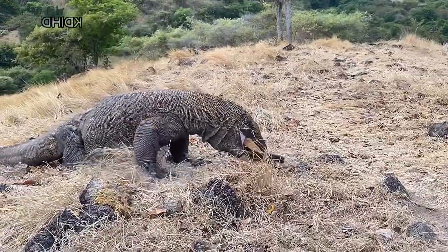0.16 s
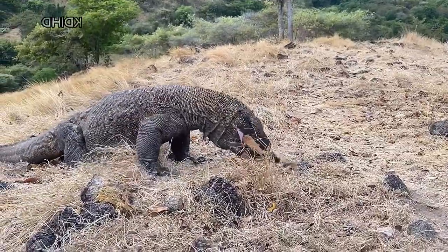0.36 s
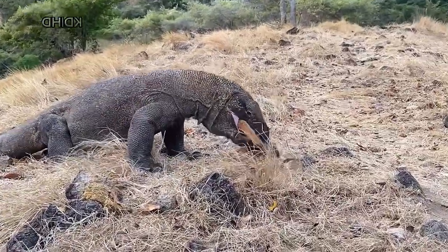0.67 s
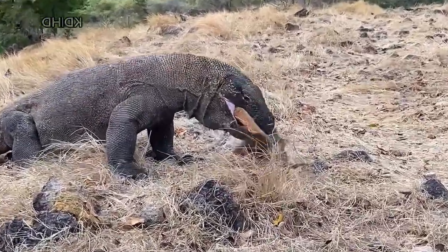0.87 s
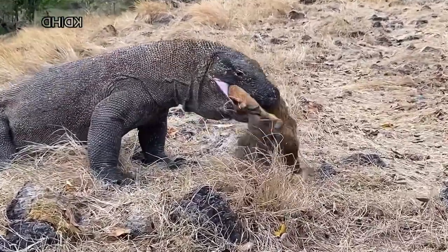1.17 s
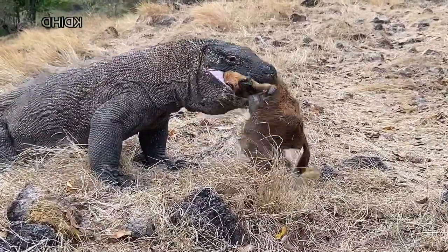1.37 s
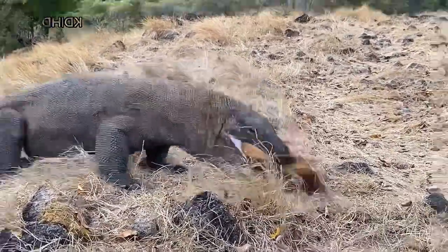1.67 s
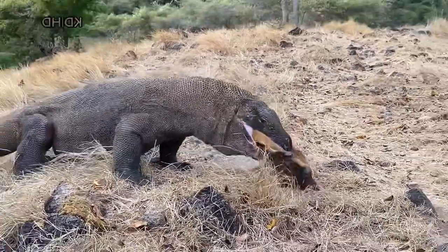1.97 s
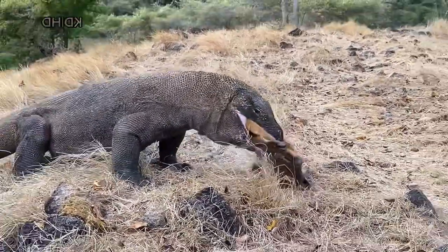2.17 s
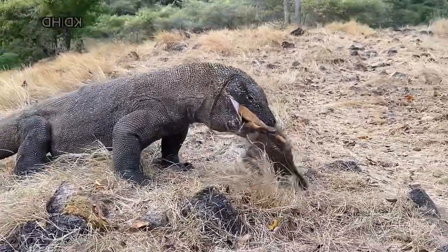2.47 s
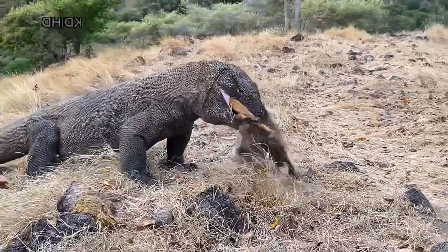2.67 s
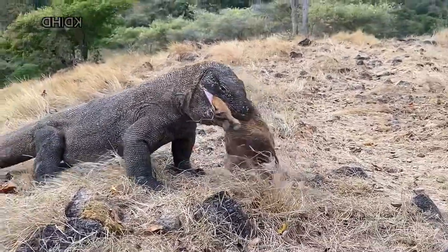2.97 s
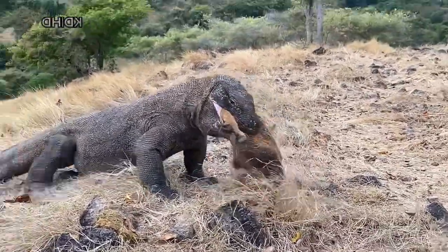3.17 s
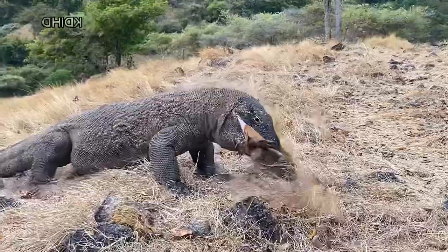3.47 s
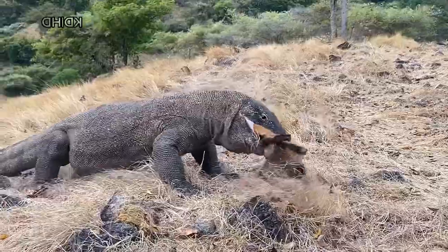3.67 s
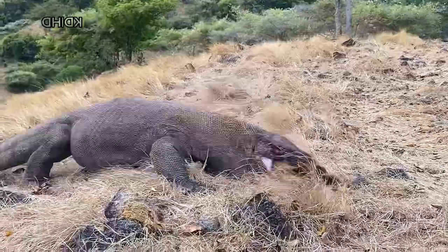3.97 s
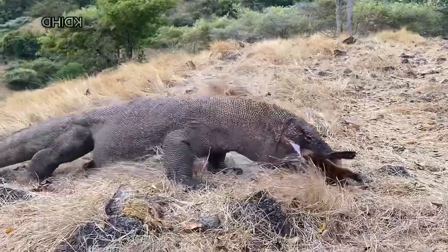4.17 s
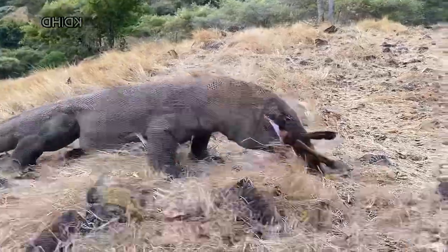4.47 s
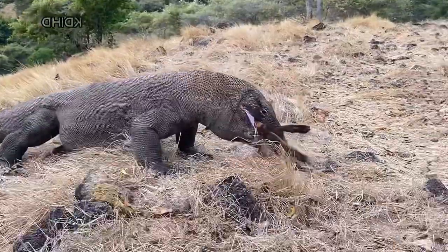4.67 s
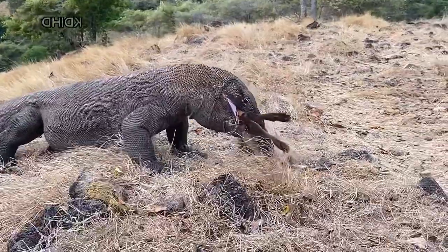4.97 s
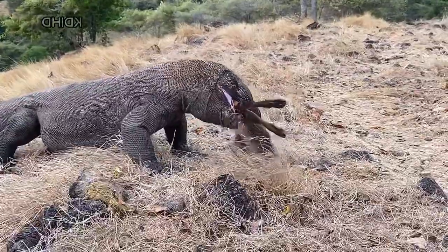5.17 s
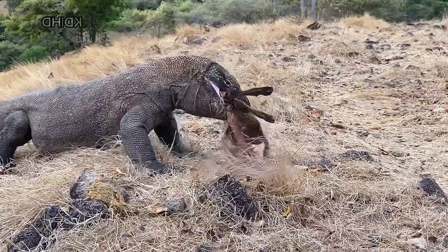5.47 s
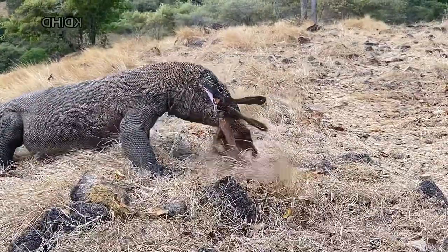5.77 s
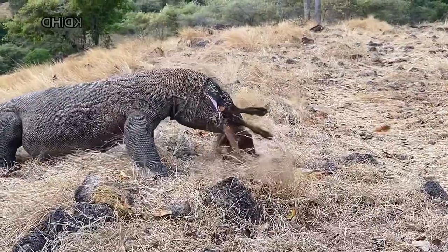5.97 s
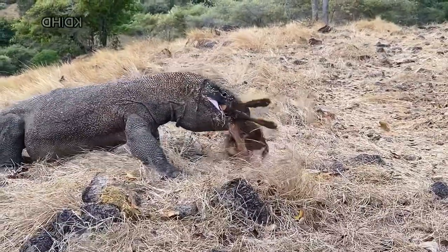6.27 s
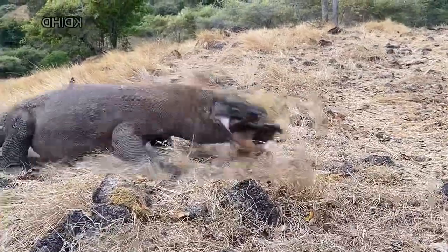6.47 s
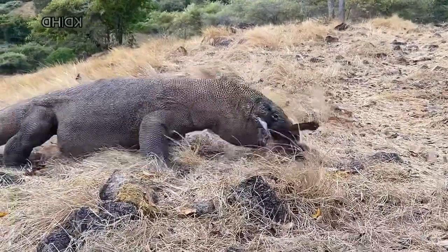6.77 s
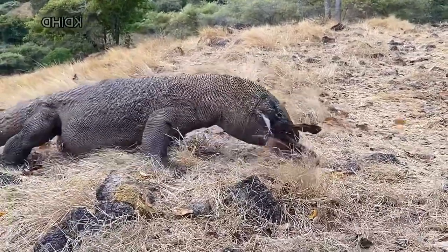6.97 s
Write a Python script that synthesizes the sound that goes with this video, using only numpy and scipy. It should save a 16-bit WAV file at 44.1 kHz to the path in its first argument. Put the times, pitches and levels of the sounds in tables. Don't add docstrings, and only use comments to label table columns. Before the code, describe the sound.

Gusty wind buffets an outdoor microphone with lumpy rumble, roar and popping slaps, while dry grass hisses and crackles faintly behind.

```python
import sys
import numpy as np
from scipy import signal
from scipy.io import wavfile
from scipy.ndimage import uniform_filter1d

SR = 44100
rng = np.random.default_rng(int(sys.argv[2]) if len(sys.argv) > 2 else 0)


def volts_from_decibels(level):
    exponent = np.asarray(level, float) / 20
    return 10 ** exponent


def put_to_file(sound):
    columns = np.atleast_2d(sound).T
    safe = np.clip(columns, -1, 1)
    whole_steps = np.round(safe * 32767)
    wavfile.write(sys.argv[1], SR, whole_steps.astype(np.int16))


N = 313992

# start_s, level_db
GRASS_LEVEL = [(0, -51), (.06, -57), (1.39, -54), (2.3, -52.5), (2.64, -49.5), (3.25, -47.5), (4.34, -48.5),
               (6.6, -48), (7.12, -52)]
# freq_hz, level_db (per Hz)
HISS_COLOUR = [(100, 5), (300, -16), (700, -1), (1000, -5), (1400, -9), (2000, -3.3), (2600, -2.5),
               (3500, -3.4), (5000, -1.4), (6800, -2.5), (8100, -2.5),
               (9000, 4.5), (11200, -0.4), (13300, 0.7), (15000, -3), (16000, -6.5)]
# middle_s, half_length_s, rise_db
LUNGES = [
    (1.66, 0.097, 3.5),
    (4.0, .08, 2.5),
    (1.704, 0.044, 7.),
]
# start_s, peak_db
STALKS = [(0.155, -49), (0.2676, -46), (0.7696, -49), (1.3993, -47), (1.5449, -35.5), (2.0216, -40),
          (2.451, -37), (2.6393, -40), (2.7267, -36), (5.4095, -40), (5.467, -43), (6.355, -44),
          (6.6024, -37), (6.6338, -37), (6.7845, -38)]

# start_s, strength_db, keenness_db (upper roar over the lower)
BREEZE_DRIFT = [(0, -85, -38), (.1, -56, -46), (.4, -45, -52), (.46, -19, -27.5), (1.0, -27, -16.5),
                (1.3, -21.5, -13.5), (1.9, -23, -8.5), (2.3, -20, -6.5), (2.778, -18, -5), (3.05, -46, -37),
                (3.6, -33.5, -30.5), (3.78, -72.5, -30), (3.97, -62, -11), (4.12, -28, -26.5),
                (5.15, -25.5, -23), (5.45, -18, -7), (6.2, -17.5, -6.5), (7.12, -19, -5.5)]
# middle_s, half_length_s, rise_db
GUSTS = [(0.15, 0.018, 14.5), (0.308, 0.029, 17), (0.436, 0.006, 13), (0.675, 0.012, 2.5),
         (0.773, 0.0087, 2), (1.051, 0.044, 8.5), (1.222, 0.0075, 1), (1.607, 0.011, 8.5),
         (1.774, 0.0067, 4), (1.966, 0.055, 10.5), (2.037, 0.017, 6.5), (2.418, 0.029, 6.5),
         (2.934, 0.045, 15), (3.253, 0.014, 9.5), (3.447, 0.032, 21), (3.535, 0.0068, 19.5),
         (3.722, 0.015, 12.5), (4.097, 0.035, 11.9), (4.495, 0.068, 6.5), (4.578, 0.013, 7.5),
         (4.696, 0.014, 9), (5.037, 0.037, 7.5), (5.312, 0.016, 5.5), (6.72, 0.009, 5.5)]
# middle_s, half_length_s, drop_db
LULLS = [(0.238, 0.03, 3), (0.389, 0.011, 9.7), (0.489, 0.033, 12.5), (0.72, 0.024, 16), (1.14, 0.024, 23),
         (1.198, 0.025, 10.5), (1.248, 0.011, 27), (1.29, 0.025, 20.5), (1.317, 0.015, 9),
         (1.375, 0.012, 14), (1.558, 0.046, 6.5), (1.839, 0.0084, 17), (2.312, 0.022, 11),
         (2.59, 0.02, 6.2), (3.104, 0.025, 14), (3.165, 0.019, 15), (3.342, 0.049, 11), (3.654, 0.027, 19),
         (4.152, 0.02, 19), (4.613, 0.0092, 9), (4.944, 0.0088, 17), (5.146, 0.013, 19), (5.79, 0.048, 4.5),
         (5.934, 0.027, 8.5), (6.031, 0.022, 25), (6.235, 0.0083, 9), (6.29, 0.083, 5), (6.512, 0.04, 8.5)]
# middle_s, half_length_s, drop_db
BREAKS = [(1.907, .012, 3.5), (2.093, 0.0084, 10), (2.49, 0.0097, 3), (2.673, 0.0088, 8.),
          (2.865, .015, 6.), (3.57, .012, 6), (3.86, 0.067, 13), (5.488, 0.0086, 10), (5.599, .008, 5),
          (6.166, 0.016, 5), (6.702, 0.012, 14.5), (6.964, 0.016, 10)]
# middle_s, half_length_s, rise_db
RASPS = [(.66, 0.041, 8), (1.42, .02, 0.5), (2.166, 0.015, 4), (2.4, .03, 2), (2.535, 0.042, 5.5),
         (2.64, 0.044, 2.), (2.713, 0.038, 5.5), (4.112, 0.02, 10), (4.531, .03, 3), (4.804, .04, 4.5),
         (5.2, .02, 7), (5.411, 0.032, 6), (5.63, .035, 4), (5.862, 0.028, 6), (6.095, 0.039, 4.),
         (6.355, 0.014, 5.), (6.613, 0.048, 2.5), (6.76, 0.055, 4.), (6.895, 0.036, 5), (7.08, 0.018, 3.)]
# middle_s, half_length_s, rise_db
HEAVES = [(.7, 0.04, 3.5), (1.445, .03, 5), (1.972, 0.036, 4), (2.182, 0.13, 4.5), (2.767, 0.035, 0),
          (3.057, 0.1, 5.5), (3.467, 0.029, 3.), (3.74, .05, 7.5), (4.112, 0.026, 5), (5.683, .05, 2.5),
          (6.0, .045, 4.), (6.787, 0.066, 4)]

# start_s, peak_db, brightness_db, pitch_hz (of the pop)
SLAPS = [(.433, -12.5, -61, 455), (.766, -8.5, -27, 514), (1.213, -11, -36, 536), (1.338, -9, -30, 644),
         (1.467, -6.5, -33, 523), (1.591, -9.5, -36, 680), (1.757, -2.5, -23, 570),
         (1.79, -4.5, -13.5, 452), (1.927, -3.5, -12, 720), (1.954, -2.5, -16, 443), (2.156, -5, -5.5, 460),
         (2.388, 1, -10.5, 544), (2.512, -7, -6, 450), (2.576, -4, -3, 1180), (2.72, 4.5, -6, 680),
         (2.788, -0.5, -26, 515), (4.085, -14.5, -35, 510), (4.512, -11.5, -15, 496),
         (4.684, -11, -42, 475), (4.727, -13, -21, 720), (5.6, -3.5, -8.5, 646), (5.646, -4, -12.5, 675),
         (5.731, -1.5, -12.5, 650), (5.85, -2, -6.5, 445), (6.063, 3, -4.5, 475), (6.191, 3, -20, 640),
         (6.356, -2, -6.5, 616), (6.714, -4, -9, 740), (6.882, 0, -5.5, 675), (6.93, -0.5, -8, 557)]
# start_s, peak_db
PUFFS = [(.523, -16.5), (.642, -14), (.678, -9), (.903, -13.5), (1.06, -9), (1.419, -9.5), (1.707, -5.5),
         (1.853, -10), (2.105, -6.5), (2.247, -11), (2.449, -9), (2.624, -8), (2.679, -3), (2.9, -14),
         (3.534, -26), (4.456, -14.5), (4.556, -9), (4.791, -19), (4.923, -14.5), (5.007, -19.5),
         (5.096, -13), (5.174, -16.5), (5.303, -8), (5.498, -14), (5.948, -12.5), (6.419, -5.5),
         (6.6, -3.5), (6.749, -7), (6.785, 1.5), (7.061, -10)]
# middle_s, peak_db, pitch_hz
PIPS = [(1.218, -13, 800), (1.268, -30, 650), (1.335, -13, 750), (2.797, -12, 750), (3.213, -40, 750),
        (3.6, -36, 600), (4.1, -21, 800), (4.51, -27, 1050), (4.527, -24.5, 1240), (4.57, -33, 1400),
        (4.75, -26, 895), (4.826, -28, 845), (4.966, -28, 900)]

# freq_hz, level_db
PORT_COLOUR = [(30, -39), (46, 2.5), (72, 1), (150, 0), (400, -0.28), (800, 0.5), (1500, -3.5), (3000, -5),
               (6000, -26.5)]
# freq_hz, likeness (0 to 1)
PORT_LIKENESS = [(40, .985), (100, .96), (180, .83), (310, .91), (600, .88), (1200, .75), (1700, .92),
                 (2100, 1)]
# freq_hz, difference_db
PORT_LEAN = [(320, 0), (490, 2), (750, 5.5), (1150, 6.5), (1750, 3.5), (2400, 0)]
# freq_hz, phase_rad
PORT_LEAD = [(60, 0), (430, .4), (1120, .15), (1460, .6), (2100, 0)]


def evened(x):
    return x / np.sqrt(np.mean(x ** 2) + 1e-20)


def read(points, hz):
    f, value = np.transpose(points)
    return np.interp(np.log(hz + 1), np.log(f + 1), value)


def lumps(t, per_s):
    knots = rng.standard_normal(4000)
    return np.interp(t * per_s, np.arange(len(knots)), knots) * np.sqrt(1.5)


def swells(t, rows):
    return sum(db * np.exp(-((t - middle) / half) ** 2) for middle, half, db in rows)


def noise_grid(size):
    frames = 4 * N // size + 5
    a, b, c, d = rng.standard_normal((frames, size // 2 + 1, 4)).T
    hz = np.fft.rfftfreq(size, 1 / SR)[:, None]
    t = np.arange(frames) * size / 4 / SR
    return hz, t, a + 1j * b, c + 1j * d


def sounded(z, band_hz):
    size = 2 * (z.shape[-2] - 1)
    samples = signal.istft(z, nperseg=size, noverlap=3 * size // 4)[1][..., :N]
    return samples * np.sqrt(1.5 * SR / size / band_hz)


def spread(hz, t, a, b):
    slip = np.pi / 2 * (hz - 6850) / 2150 * (hz > 7500)
    edge = .38 + .07 * lumps(t, 43.)
    mid = a * np.cos(slip) * (abs(np.cos(slip)) > edge)
    side = 1j * (.7 * a + .5 * b) * np.sin(slip) * (abs(np.sin(slip)) > edge + .1)
    wide_hz, wide_until_s = 2000, .8
    side = side + 0.9 * b * (hz < wide_hz)
    side = side + 0.39 * b * (hz >= wide_hz) * (hz < 6400) * (t < wide_until_s)
    return np.array([mid + side, mid - side])


def grass():
    hz, t, a, b = noise_grid(size=512)
    start_s, hiss_db = np.transpose(GRASS_LEVEL)
    chance = rng.standard_normal(a.T.shape).T
    patches = evened(uniform_filter1d(uniform_filter1d(chance, 6, 0), 20, 1))
    top_db = (-9.5 + 2.5) * np.clip((hz - 8000) / 1500, 0, 1)
    level_db = np.interp(t, start_s, hiss_db) + swells(t, LUNGES) + top_db + 0.25 * lumps(t, 42.)
    power = volts_from_decibels(read(HISS_COLOUR, hz) + level_db + 1.2 * patches) ** 2
    for start, peak_db in STALKS:
        snap_db = peak_db - 9.0 - 6. * ((hz - 4500) / 3000) ** 2
        power += volts_from_decibels(snap_db) ** 2 * np.exp(-((t - start - .0018) / 0.0063) ** 2)
    return sounded(spread(hz, t, a, b) * np.sqrt(power) * (hz < 15830), 4830)


def breeze(t):
    start_s, drift_db, keen_db = np.transpose(BREEZE_DRIFT)
    quick_db = swells(t, GUSTS) - swells(t, LULLS) - swells(t, BREAKS)
    rasp_db = swells(t, RASPS)
    keen_db = np.interp(t, start_s, keen_db) + 0.23 * quick_db + rasp_db
    return np.interp(t, start_s, drift_db), quick_db + 0.27 * rasp_db, keen_db


def eddies():
    puff_dull_db, puff_hz = -6, 531
    return SLAPS + [(s, db, breeze(s)[2] + puff_dull_db, puff_hz) for s, db in PUFFS]


def leaned(hz):
    return read(PORT_LEAN, hz) * np.array([[.5], [-.5]])


def ports(hz, left, other):
    same = np.clip(read(PORT_LIKENESS, hz), 0, 1)
    right = (same * left + np.sqrt(1 - same ** 2) * other) * np.exp(-1j * read(PORT_LEAD, hz))
    lean_db = read(PORT_LEAN, hz)
    return np.array([left * volts_from_decibels(lean_db / 2), right * volts_from_decibels(-lean_db / 2)]) * volts_from_decibels(read(PORT_COLOUR, hz))


def rumble():
    hz, t, a, b = noise_grid(size=2048)
    low = sounded(ports(hz, a, b) / (1 + (hz / 187.5) ** 3), 100.5)
    now = np.arange(N) / SR
    held = now[::64]
    drift_db, quick_db, _ = breeze(held)
    level_db = -6.5 + .69 * drift_db + .5 * quick_db + swells(held, HEAVES)
    return low * volts_from_decibels(np.repeat(level_db, 64)[:N] + 0.76 * lumps(now, 24.))


def shedding(size, spiky_db, per_s):
    spikiness_db = spiky_db * np.tanh(0.82 * lumps(np.arange(N) / SR, per_s))
    spikes = rng.standard_normal((N, 2)).T * volts_from_decibels(spikiness_db)
    hz, t, z = signal.stft(evened(spikes), SR, nperseg=size, noverlap=3 * size // 4)
    left, other = z * np.sqrt(size / 3)
    return hz[:, None], t, left, other


def roar():
    hz, t, a, b = shedding(size=256, spiky_db=8.5, per_s=520.)
    drift_db, quick_db, keen_db = breeze(t)
    gust = np.tanh(0.18 * lumps(t, 45.) + 0.5 * lumps(t, 120.) + 0.34 * lumps(t, 260.))
    height = (np.maximum(hz - 250, 0) / 800) ** 1.055
    fall_db = np.minimum(keen_db - 6.0 + 2.96 * gust, -3.5)
    power = volts_from_decibels(drift_db + quick_db + 2. + 3.93 * gust + fall_db * height) ** 2
    for start, peak_db, slap_db, _ in eddies():
        age = t - start - .002
        attack = np.exp(np.minimum(age, 0) / 0.00063)
        decay = np.exp(-np.maximum(age, 0) / 0.0046)
        shape = np.where(age < 0, attack, decay)
        near = np.flatnonzero(shape > 1e-4)
        tilt_db = min(slap_db - 4.0, -5.) * (height - .6) / 2.04
        dulling_db = -400. * height * np.maximum(age[near], 0)
        power[:, near] += volts_from_decibels(peak_db - 12.0 + tilt_db + dulling_db) ** 2 * shape[near]
    above = hz ** 2 / (hz ** 2 + 42.0 ** 2)
    return sounded(ports(hz, a, b) * np.sqrt(power) * above, 435)


def pips():
    out, t = np.zeros((2, N)), np.arange(-600, 600) / SR
    half_s, glide = .003, -.15
    for middle, peak_db, hz in PIPS:
        cycles = hz * t * (1 + glide * t / half_s / 2)
        tone = np.exp(-(t / half_s) ** 2) * np.sin(2 * np.pi * cycles)
        at = round(middle * SR) - len(t) // 2
        out[:, at:at + len(t)] += volts_from_decibels(peak_db + leaned(hz)) * tone
    return out


def pops():
    out = np.zeros((2, N + SR))
    for start, peak_db, _, hz in eddies():
        turns = np.arange(-3, 3, hz / SR) * 0.81
        phase = turns - 0.16 * turns ** 2 + rng.random()
        swing = np.exp(-(turns / 0.52) ** 2) * np.cos(2 * np.pi * phase)
        at = round((start + 0.00038) * SR)
        out[:, at:at + len(swing)] += volts_from_decibels(peak_db - 6.5 + leaned(hz)) * swing
    return out[:, :N]


def scene():
    return grass() + rumble() + roar() + pips() + pops()


def roll_off(x):
    return signal.sosfilt(signal.butter(12, 15830, fs=SR, output="sos"), x)


def record(dry):
    bass_cut = signal.butter(4, 42., "high", fs=SR, output="sos")
    heard = signal.sosfilt(bass_cut, dry)
    limit = .98
    return roll_off(limit * np.tanh(heard / limit))


dry = scene()
out = record(dry)
put_to_file(out)
```